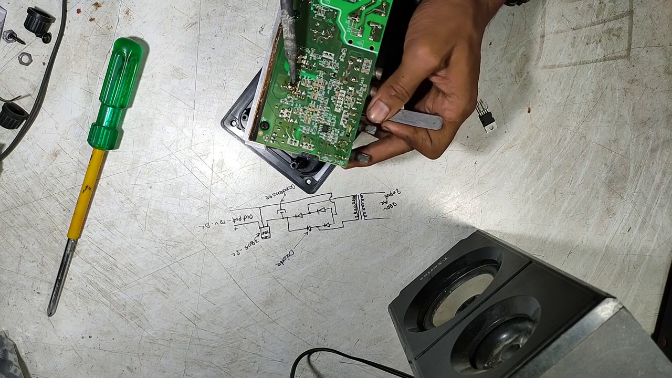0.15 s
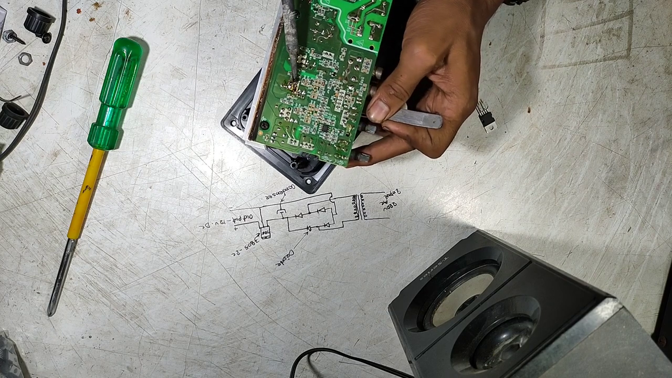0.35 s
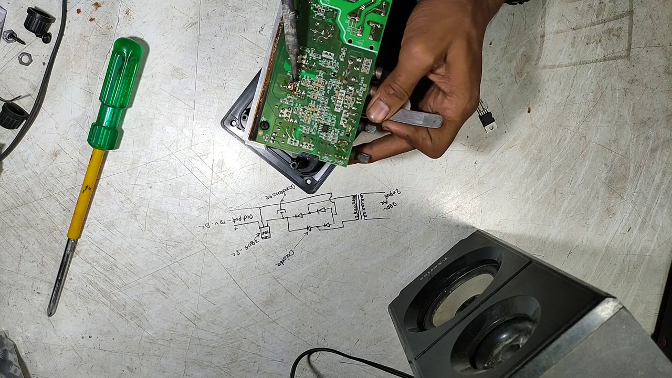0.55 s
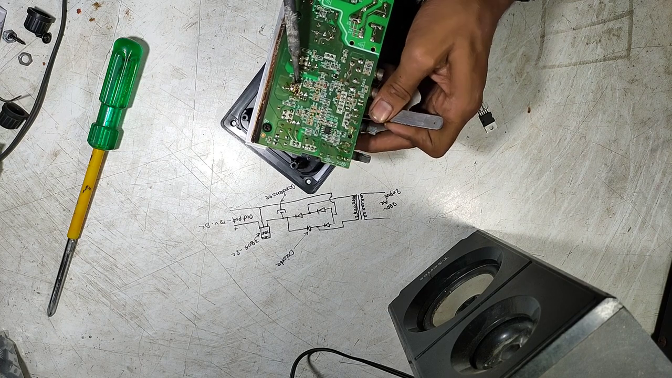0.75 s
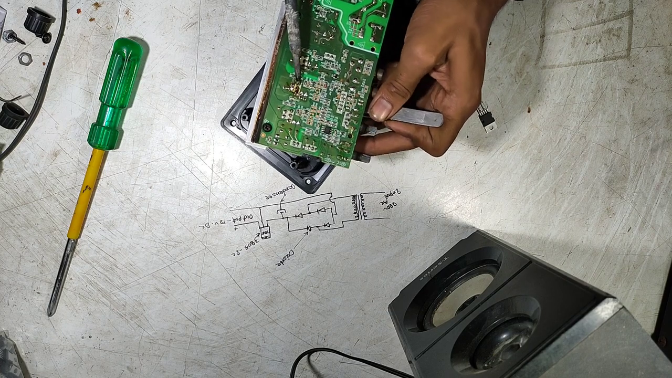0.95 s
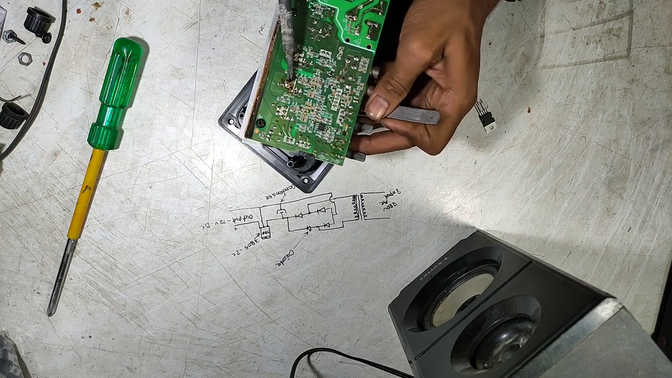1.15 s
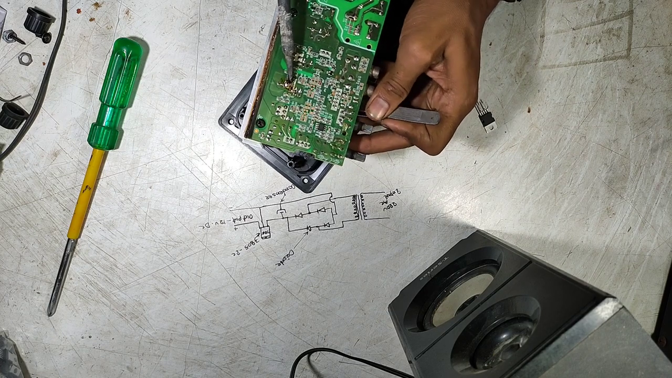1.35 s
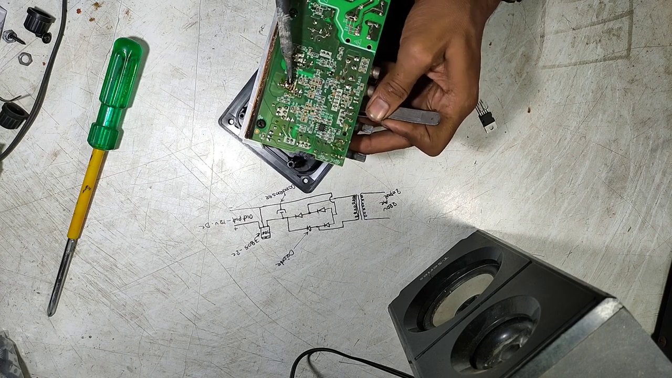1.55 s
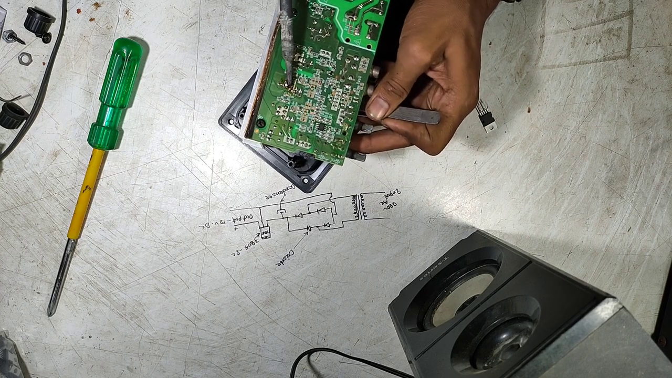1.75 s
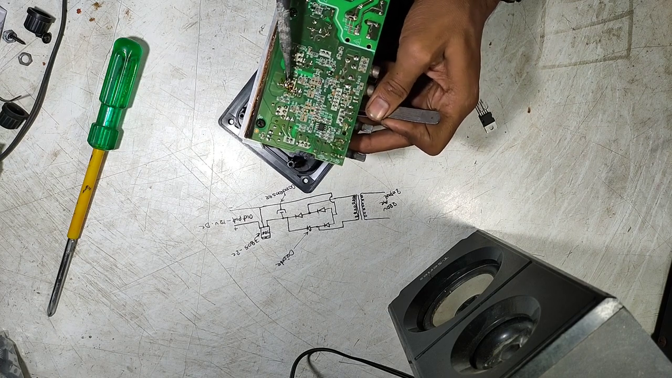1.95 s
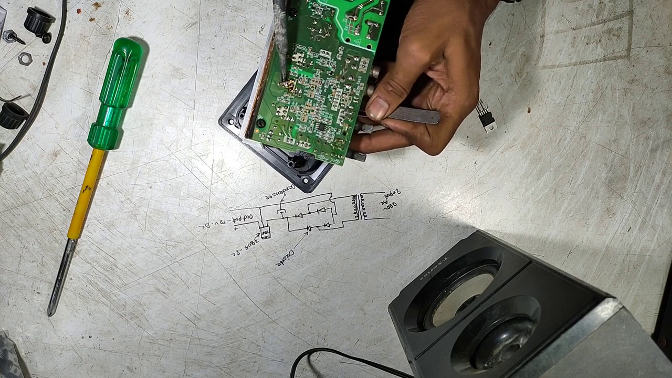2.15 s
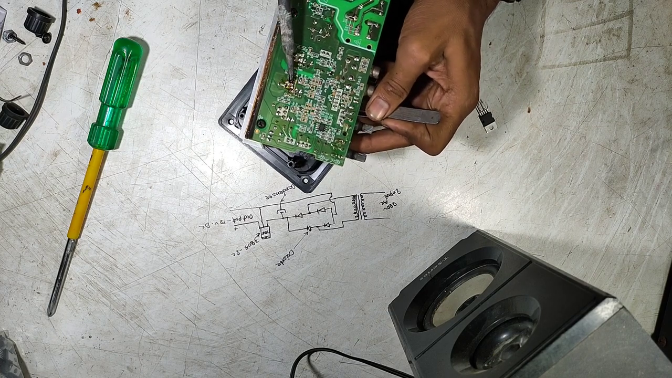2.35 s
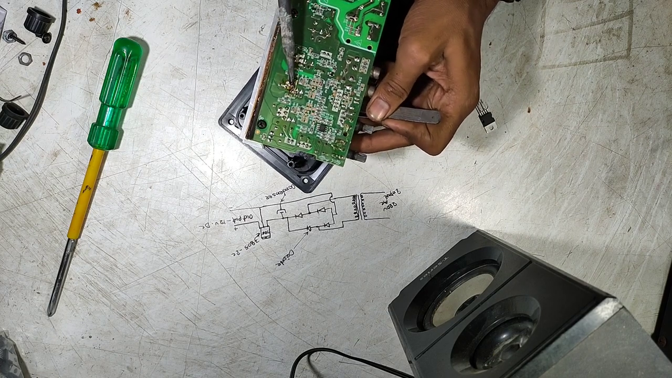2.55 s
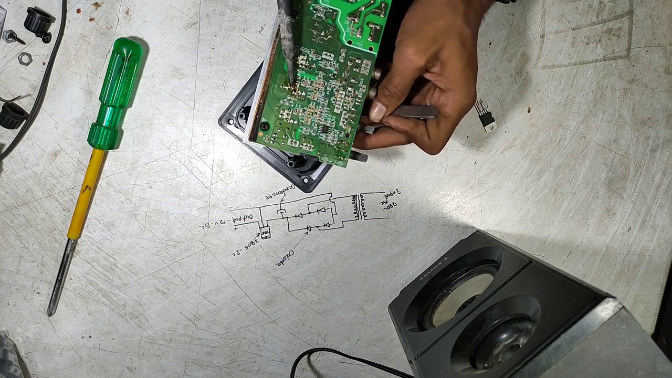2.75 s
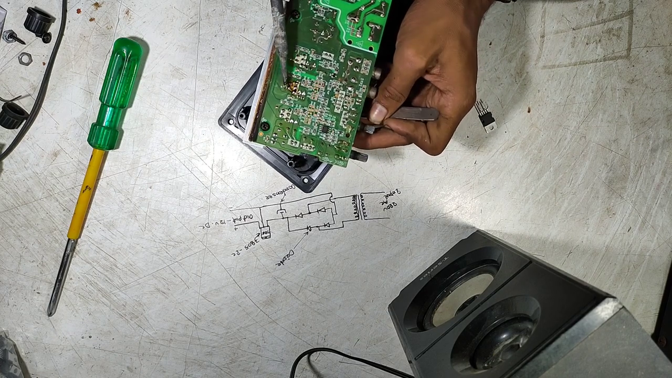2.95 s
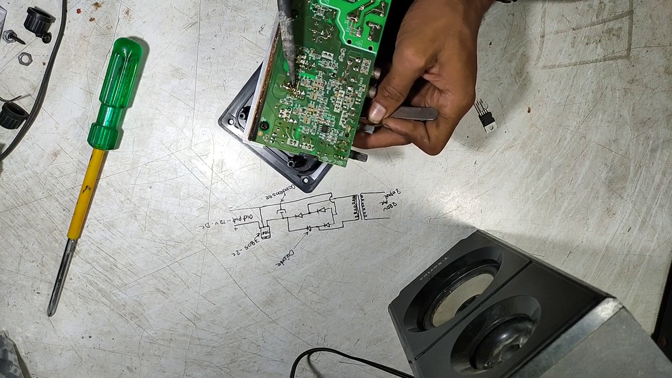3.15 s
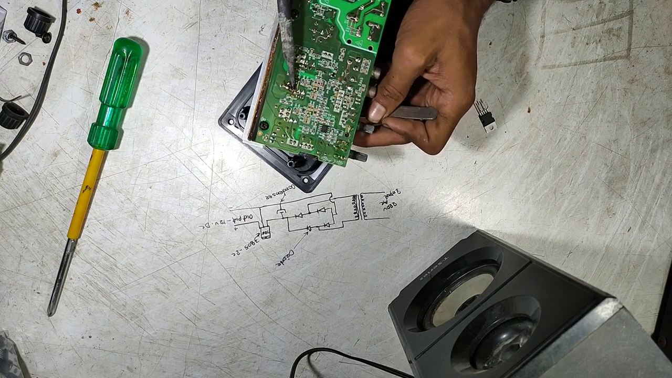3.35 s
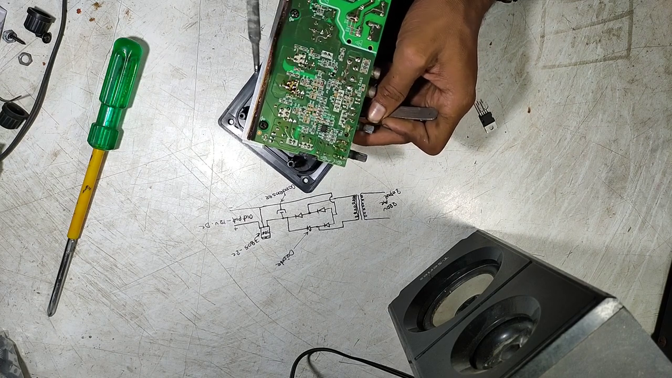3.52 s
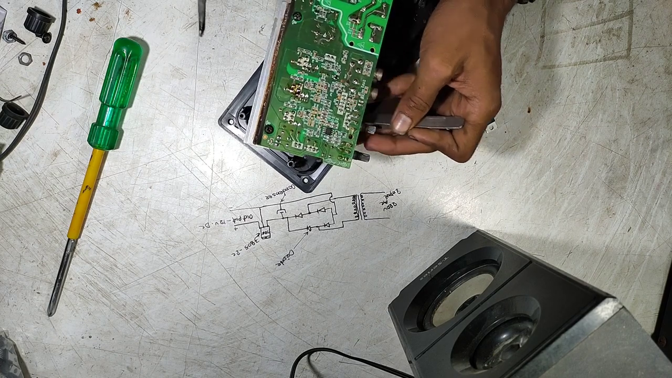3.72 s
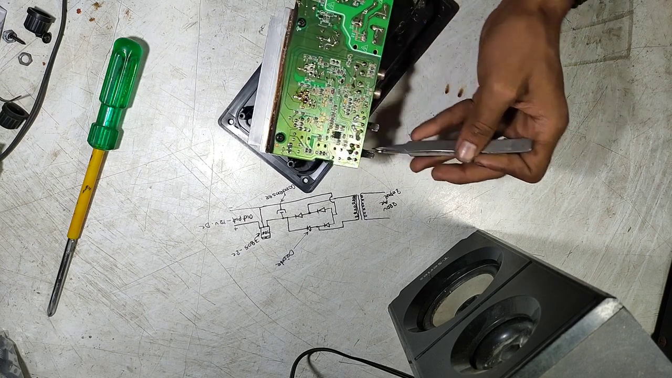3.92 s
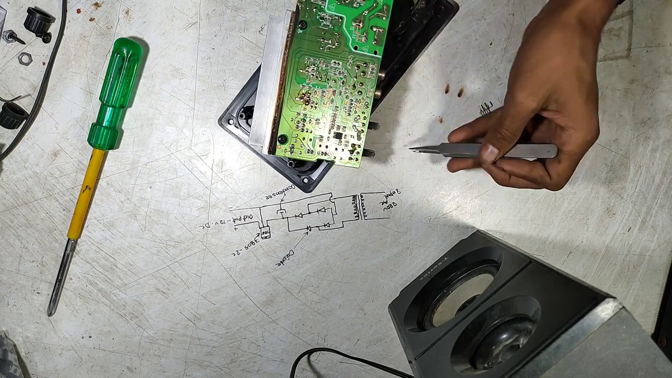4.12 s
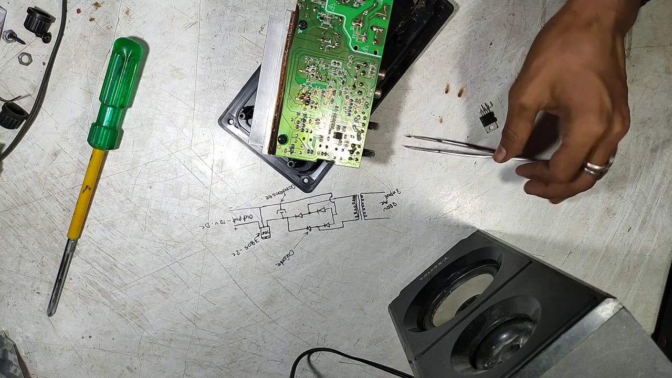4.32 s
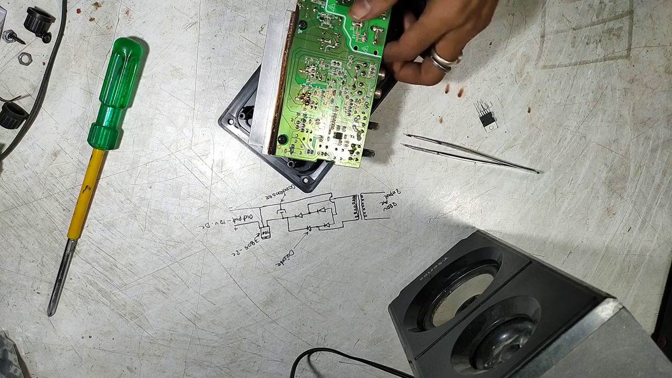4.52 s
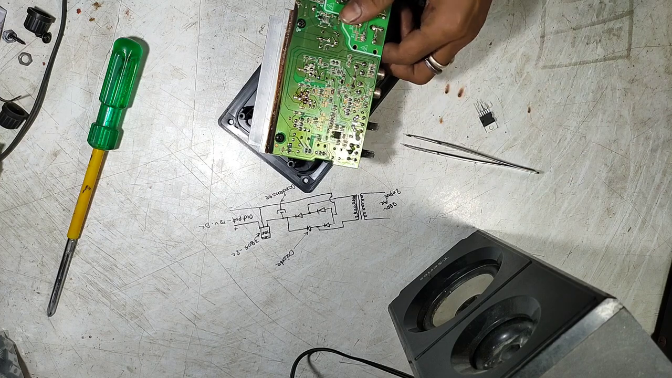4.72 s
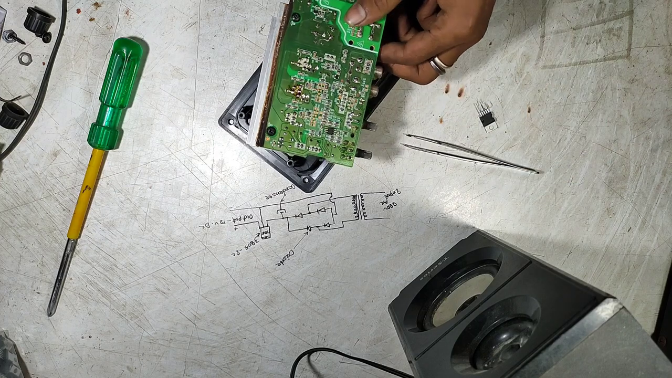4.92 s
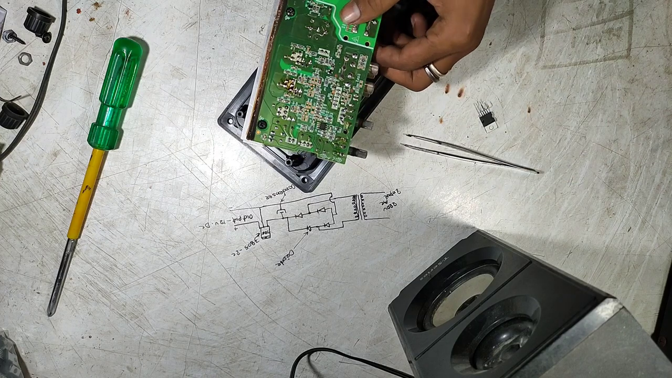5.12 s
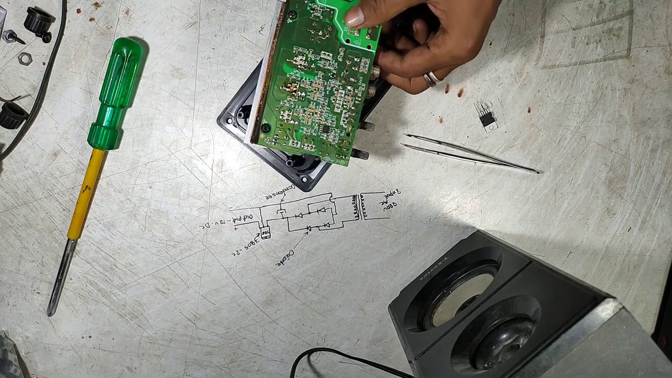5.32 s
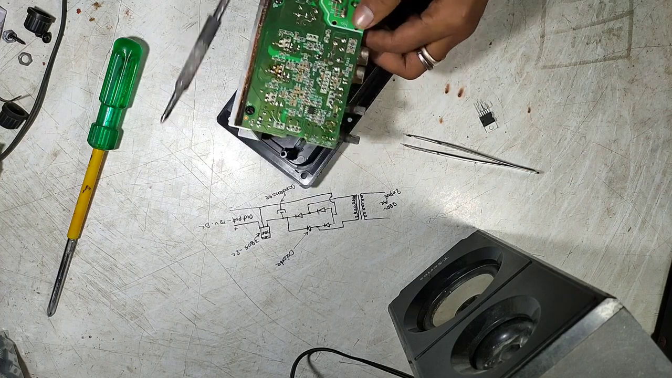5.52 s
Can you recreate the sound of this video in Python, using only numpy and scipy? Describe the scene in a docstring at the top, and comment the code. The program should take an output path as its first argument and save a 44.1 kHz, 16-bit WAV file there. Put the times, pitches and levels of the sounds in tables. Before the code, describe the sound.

Soldering work at a bench: faint flux sizzle, knocks and taps on a circuit board, then metal tweezers clattering down, over a low fan rumble.

```python
"""Soldering at a workbench, with a fan rumbling throughout as coloured noise and a small room echoing the work.
Early on the board is knocked and tapped, ringing bench, board and metal modes; flux crackles, sizzles as
filtered grains and squeaks as gliding tones. Mid-scene come harder knocks and low thumps, and the board
slides in grainy friction. Then steel tweezers bounce, rattle and skid on the bench, ringing their own modes.
Last come a few more knocks, taps and thumps, and the board is shifted by hand once more."""
import sys
import numpy as np
from scipy import signal
from scipy.fft import rfft, irfft, next_fast_len
from scipy.io import wavfile

SR = 44100
rng = np.random.default_rng(int(sys.argv[2]) if len(sys.argv) > 2 else 0)


def wav_record(signal):
    """Record a signal, one row per channel, as 16-bit PCM in the file named by sys.argv[1]."""
    frames = np.transpose(np.atleast_2d(signal))
    bounded = np.clip(frames, -1, 1)
    # unit amplitude maps onto the largest positive 16-bit level
    quanta = np.round(bounded * 32767).astype(np.int16)
    wavfile.write(sys.argv[1], SR, quanta)


N = 250488
HIT_SIZE = SR // 6  # samples in one blow
LEVEL_WINDOW = SR // 100  # samples over which a blow's level is defined


def from_db(db):
    """Decibels to gain."""
    return 10 ** (np.asarray(db) / 20)


def rms_one(x):
    """Scale to rms 1."""
    return x / np.sqrt(np.mean(x ** 2) + 1e-20)


def blow_at(x, db):
    """Give a blow the energy of 10 ms of sound at this level."""
    return from_db(db) * rms_one(x) * np.sqrt(LEVEL_WINDOW / len(x))


def add(out, start_s, x):
    """Mix x into out from start_s."""
    i = int(np.clip(round(start_s * SR), 0, N - 1))
    out[i:i + len(x)] += x[:N - i]


def cut(x, hz, kind, order=2):
    """Butterworth low- or high-pass."""
    sos = signal.butter(order, min(hz, .45 * SR), kind, fs=SR, output="sos")
    return signal.sosfilt(sos, x)


def colour(x, points):
    """Causal (minimum-phase) filter that follows a spectrum and falls away beyond its ends."""
    size = 2 * next_fast_len(len(x))
    hz, db = np.transpose(points)
    octave = np.log2(np.maximum(np.fft.rfftfreq(size, 1 / SR), 2))
    known = np.log2(hz)
    # 20 dB per octave outside the curve, for at most two octaves
    beyond = np.minimum(abs(octave - np.clip(octave, known[0], known[-1])), 2)
    cepstrum = irfft(np.log(from_db(np.interp(octave, known, db) - 20 * beyond)))
    # folding the cepstrum onto positive time makes the phase minimal
    cepstrum[1:size // 2] *= 2
    cepstrum[size // 2 + 1:] = 0
    response = np.exp(rfft(cepstrum))
    return irfft(rfft(x, size) * response)[:len(x)]


def drift(size, per_s):
    """Straight lines joining random normal points (mean 0, spread 1), per_s points a second."""
    steps = np.arange(size) * per_s / SR
    count = int(steps[-1]) + 2
    return np.interp(steps, np.arange(count), rng.standard_normal(count))


def grains(size, per_s, spread_db):
    """Random tiny clicks of uneven strength."""
    strength = from_db(spread_db * np.minimum(rng.exponential(1, size), 4))
    return strength * rng.standard_normal(size) * (rng.random(size) < per_s / SR)


def ring(force, modes, centre_hz, focus_db):
    """Modes driven by a force; the point of contact favours those near centre_hz, by focus_db an octave away."""
    out = 0
    for hz, db, t60 in modes:
        r = from_db(-60 / (t60 * SR))  # decay per sample
        w = 2 * np.pi * hz / SR
        focus = focus_db * np.log2(hz / centre_hz) ** 2
        weight = from_db(db - focus + 2 * rng.standard_normal())
        sign = np.sign(rng.random() - .25)  # about one mode in four is inverted
        mode = signal.lfilter([0, np.sin(w)], [1, -2 * r * np.cos(w), r * r], force + 1e-18)
        out = out + sign * weight * mode
    return out


# fan rumble and air rush spectra: (pitch_hz, relative density_db per Hz)
FAN_RUMBLE = [(8.8, -37.5), (15, 1.5), (32, -2.5), (59, -7), (76, -14.5), (102, -16.5), (130, -22),
              (193, -24), (249, -29.5), (322, -29), (389, -37), (607, -40.5), (900, -60.5), (1170, -82.5),
              (1980, -120)]
FAN_AIR = [(350, -13.5), (700, 3), (1200, -2.5), (1800, -2), (2600, -8.5), (3700, -7.5), (4450, -7.5),
           (4900, -17), (8000, -24), (12000, -25), (15500, -33.5)]
RUMBLE_DB, AIR_DB = -33, -60.5


def fan():
    """A low rumble under a soft rush of air: two layers of coloured noise."""
    rumble, air = rng.standard_normal((2, N))
    rumble = from_db(RUMBLE_DB) * rms_one(colour(rumble, FAN_RUMBLE))
    return rumble + from_db(AIR_DB) * rms_one(colour(air, FAN_AIR))


def contact(chatter_t60, chatter_per_s):
    """One sharp touch followed by micro-bounces; the longer they last, the more of the blow they carry."""
    t = np.arange(HIT_SIZE) / SR
    chatter_t60 = max(chatter_t60, .001)
    force = grains(HIT_SIZE, per_s=9000, spread_db=3) * from_db(-60 * t / chatter_t60)
    force *= np.sqrt(chatter_per_s * chatter_t60 / (np.sum(force ** 2) + 1e-20))
    force[0] += 1
    return force


# spectrum of a hard contact: (pitch_hz, relative density_db per Hz)
SNAP_COLOUR = [(3000, -25.5), (4800, 2.5), (6500, 3), (9500, 0.5), (12500, -6.5), (14500, -10.5),
               (15800, -24.5)]


def snap(force, t60):
    """The crowded, heavily damped top modes of a hard contact, as decaying noise."""
    t = np.arange(SR // 40) / SR
    crack = rng.standard_normal(len(t)) * from_db(-60 * t / t60)
    return colour(signal.fftconvolve(force, crack)[:len(force)], SNAP_COLOUR)


# resonances of bench top, board and small metal parts, before contact weighting:
# (pitch_hz, relative level_db, t60_s)
BENCH_MODES = [(64.9, 11, 0.1), (93, -4, 0.38), (120, -7.5, .08), (149.32, -3, 0.089), (181.9, -2.5, .1),
               (231.47, -3.5, .06), (283.4, -2, .065), (333.6, -7, 0.13), (380.3, -3.5, 0.098),
               (465, -4.5, 0.051), (570, -0.5, .025)]
BOARD_MODES = [(604, -3, 0.0314), (730, -6.5, 0.049), (854.8, -7.5, .024), (994, -5, 0.016),
               (1160.2, -3.5, 0.018), (1205, -9, 0.02), (1408, -2, 0.011), (1602, 4, 0.011),
               (1810, -4.5, .012)]
METAL_MODES = [(2188.8, -2.5, .018), (2492, -0.5, .014), (2749.5, -11, 0.012), (3020, -7.5, .016),
               (3419, -0.5, 0.0097), (3791, -0.5, 0.0073), (4010, -7, 0.013), (4314.4, -5.5, .014)]


def blow(thud_db, clack_db, tick_db, snap_db, thud_hz, clack_hz, chatter_t60):
    """One blow shakes the bench, the board and the small metal parts on it."""
    force = contact(chatter_t60, chatter_per_s=201.5)
    thud = cut(ring(force, BENCH_MODES, thud_hz, focus_db=5.5), 900, "low")
    clack = cut(ring(force, BOARD_MODES, clack_hz, focus_db=11), 2000, "low")
    tick = cut(ring(force, METAL_MODES, 3700, focus_db=2.5), 4228, "low", order=10)
    body = blow_at(thud, thud_db) + blow_at(clack, clack_db)
    return body + blow_at(tick, tick_db) + blow_at(snap(force, t60=0.0036), snap_db)


THUD_HZ, THUD_OCTAVES_PER_S = 210, 3  # the longer the contact chatters, the deeper the thud
CLACK_HZ, CLACK_OCTAVES_PER_DB = 1850, .021  # at a tick of 0 dB; softer contacts clack lower
SNAP_BELOW_TICK_DB = 14.5


def knock(thud_db, clack_db, tick_db, chatter_t60):
    """A firm contact with a sharp snap: the harder it is the brighter, the longer the deeper."""
    thud_hz = THUD_HZ * 2 ** (-THUD_OCTAVES_PER_S * chatter_t60)
    clack_hz = CLACK_HZ * 2 ** (CLACK_OCTAVES_PER_DB * tick_db)
    return blow(thud_db, clack_db, tick_db, tick_db - SNAP_BELOW_TICK_DB, thud_hz, clack_hz, chatter_t60)


# the board knocked by the iron or against its chassis, and one firm tap of a tool at 3.94 s: # (start_s, bench
# thud_db, board clack_db, metal tick_db, chatter_t60_s)
BOARD_KNOCKS = [(.0208, -35, -54, -57, .07), (.5788, -31, -47, -51, .026), (.6923, -32, -55, -49, .04),
                (.7242, -31, -49, -51, .11), (.7602, -34, -50, -51, .06), (.8791, -33, -46, -49, .1),
                (.996, -16, -22, -25, .046), (1.1134, -25, -36, -40, .12), (1.1414, -23, -32, -53, .045),
                (1.1956, -30, -43, -40, .008), (1.764, -28, -47, -45, .03), (1.8207, -21, -33, -54, .046),
                (1.8557, -44, -50, -53, .018), (2.1545, -42, -45, -49, .014), (2.1866, -27, -31, -42, .028),
                (2.4392, -18, -39, -31, .007), (2.471, -27, -47, -48, .058), (2.5141, -32, -47, -48, .004),
                (2.5998, -16, -33, -35, .057), (2.6498, -33, -50, -53, .018), (2.6847, -28, -40, -47, .027),
                (2.715, -16, -40, -23, .008), (2.7174, -28, -21, -16, .013), (2.7245, -15, -4, -11, .023),
                (2.7399, -19, -21, -27, .055), (2.7565, -18, -31, -37, .038), (2.941, -40, -45, -51, .027),
                (2.9637, -33, -40, -49, .035), (2.992, -33, -43, -53, .02), (3.9392, -23, -39, -35, .06),
                (4.7425, -48, -52, -46, .003), (4.8593, -12, -19, -17, .006), (4.8845, -15, -23, -37, .02),
                (4.8961, -22, -29, -43, .06), (4.978, -13, -17, -29, .002)]
# light taps of a tool as it is moved: (start_s, bench thud_db, board clack_db, metal tick_db)
TOOL_TAPS = [(.281, -50, -54, -65), (1.6119, -42, -49, -70), (2.8257, -34, -37, -55),
             (3.7882, -33, -18, -24), (3.8089, -32, -23, -33), (3.8381, -25, -34, -42),
             (3.8918, -31, -29, -35), (4.0474, -27, -28, -43), (4.1135, -20, -18, -39),
             (4.1219, -27, -35, -56), (4.1649, -35, -43, -58), (4.1975, -28, -30, -58),
             (4.633, -21, -24, -32), (4.661, -33, -32, -39), (4.7969, -35, -44, -56),
             (5.4176, -29, -21, -41), (5.6757, -32, -29, -42)]
TAP_THUD_HZ, TAP_CLACK_HZ = 245, 1190
TAP_SNAP_BELOW_TICK_DB, TAP_CHATTER_T60_S = 25, .006


def board_knocks():
    """Firm knocks and the duller taps of a tool, each a struck set of modes."""
    out = np.zeros(N)
    for start_s, thud_db, clack_db, tick_db, chatter_t60 in BOARD_KNOCKS:
        add(out, start_s, knock(thud_db, clack_db, tick_db, chatter_t60))
    for start_s, thud_db, clack_db, tick_db in TOOL_TAPS:
        snap_db = tick_db - TAP_SNAP_BELOW_TICK_DB
        tap = blow(thud_db, clack_db, tick_db, snap_db, TAP_THUD_HZ, TAP_CLACK_HZ, TAP_CHATTER_T60_S)
        add(out, start_s, tap)
    return out


def reflections(x, t60, db, top_hz):
    """A diffuse, dulled tail of echoes; the longer it lasts, the more slowly it builds."""
    t = np.arange(SR // 2) / SR
    build = np.minimum(30 * t / t60, 1)
    tail = rng.standard_normal(len(t)) * from_db(-60 * t / t60) * build
    tail = cut(tail / np.sqrt(np.sum(tail ** 2)), top_hz, "low", order=1)
    return from_db(db) * signal.fftconvolve(x, tail)[:N]


# bubble spectra of boiling flux, low and high: (pitch_hz, relative density_db per Hz)
SPUTTER_COLOUR = [(500, -12), (1300, -5), (1950, 11), (2800, -9.5), (4100, 4.5), (4600, -13.5), (5300, -23)]
HISS_COLOUR = [(3500, -22.5), (5000, -13.5), (7000, -0.5), (8500, -2.5), (10500, -2.5), (12500, -10.5),
               (14500, -13), (15800, -21)]


def simmer():
    """Under and between puffs the hot joint keeps up a faint crackle of sparse grains."""
    heat = np.interp(np.arange(N) / SR, [.4, .8, 1.3, 1.7, 3.0, 3.6], [0, 1, 1, .3, .4, 0])
    pops = grains(N, per_s=400, spread_db=3.5)
    sputter = from_db(-70) * rms_one(colour(pops, SPUTTER_COLOUR))
    hiss = from_db(-73) * rms_one(colour(pops, HISS_COLOUR))
    return heat * (sputter + hiss)


def squeak(length, from_hz, to_hz):
    """A rough, gliding whistle of vapour through a closing gap; rms 1."""
    size = int(length * SR)
    hz = np.geomspace(from_hz, to_hz, size) * (1 + .045 * drift(size, per_s=2030))
    swell = signal.windows.tukey(size, .7) * from_db(3 * drift(size, per_s=599))
    return rms_one(swell * np.sin(2 * np.pi * np.cumsum(hz) / SR))


def whistles(length, low_hz, high_hz, count):
    """Tiny whistles of bursting bubbles, scattered in time and pitch over a puff."""
    out = np.zeros(int(length * SR))
    for when, pitch, glide in rng.random((count, 3)):
        hz = low_hz + (high_hz - low_hz) * pitch
        chirp = squeak(.007, hz, hz * (.88 + .24 * glide))[:len(out)]
        i = int(when * (len(out) - len(chirp)))
        out[i:i + len(chirp)] += chirp
    return out


# puffs of flux boiling off: (start_s, length_s, sputter_db, hiss_db)
FLUX_PUFFS = [(.454, .027, -51, -48), (.483, .034, -41, -42), (.578, .017, -45, -55), (.815, .04, -56, -75),
              (.846, .09, -50, -61), (.917, .095, -52, -56), (1.04, .027, -39, -50), (1.103, .06, -49, -61),
              (1.18, .06, -61, -63), (1.321, .05, -51, -63), (1.456, .024, -50, -63),
              (1.784, .036, -51, -65), (1.917, .038, -31.5, -42), (1.963, .06, -59, -71),
              (2.198, .028, -54, -65), (2.8, .033, -51, -66), (3.382, .032, -53, -69),
              (3.442, .04, -57, -75), (3.526, .021, -52, -70)]
# vapour squeaking out of the joint: (start_s, length_s, start pitch_hz, end pitch_hz, level_db)
VAPOUR_SQUEAKS = [(.463, .01, 11200, 10180, -47), (.481, .023, 8790, 7785, -38),
                  (.504, .013, 3595, 1481, -44), (1.12, .016, 7540, 8000, -49),
                  (1.18, .046, 8600, 9900, -51), (1.264, .012, 9105, 8240, -60),
                  (1.315, .016, 10100, 8380, -47), (1.942, .013, 1993, 4450, -47),
                  (1.956, .013, 8651, 10340, -41), (3.032, .026, 11600, 11400, -55)]
BURST_DB, WHISTLE_DB = -2, -5  # levels of the bursts and whistles relative to the puff


def flux():
    """Puffs of boiling flux: dense bursting bubbles, mixed with tiny whistles and a few longer squeaks."""
    out = np.zeros(N)
    for start_s, length, sputter_db, hiss_db in FLUX_PUFFS:
        size, count = int(length * SR), int(length * 170)
        puff = signal.windows.tukey(size, .35) * from_db(3.5 * drift(size, per_s=200))
        bursts = puff * grains(size, per_s=11000, spread_db=-0.5)
        layers = [(sputter_db, SPUTTER_COLOUR, 1700, 4300), (hiss_db, HISS_COLOUR, 5500, 12500)]
        for db, spectrum, low_hz, high_hz in layers:
            add(out, start_s, from_db(db + BURST_DB) * rms_one(colour(bursts, spectrum)))
            add(out, start_s, from_db(db + WHISTLE_DB) * whistles(length, low_hz, high_hz, count))
    for start_s, length, from_hz, to_hz, db in VAPOUR_SQUEAKS:
        add(out, start_s, from_db(db) * squeak(length, from_hz, to_hz))
    return out


# the heaviest blows rock the whole bench top: (start_s, pitch_hz, level_db, t60_s)
BENCH_THUMPS = [(2.723, 80.88, -11.5, 0.304), (3.937, 88.6, -26.5, 0.103), (4.858, 95.8, -15, 0.42),
                (4.98, 97.3, -15, 0.227)]


def thumps():
    """The bench top sways: one low, decaying sine per thump."""
    out = np.zeros(N)
    t = np.arange(SR // 3) / SR
    for start_s, hz, db, t60 in BENCH_THUMPS:
        sway = np.sin(2 * np.pi * hz * t) * from_db(-60 * t / t60)
        add(out, start_s, blow_at(sway, db))
    return out


# strokes of the board rubbing on its chassis as the hand moves it, each a level curve:
# (time_s, level_db relative to SLIDE_DB)
BOARD_SLIDES = [
    [(2.8, -54.5), (2.826, -61.5), (2.95, -65.5), (3.2, -64)],
    [(3.68, -60), (3.752, -45), (3.892, -39), (3.964, -50.5), (4.13, -54.5), (4.23, -54.5), (4.33, -41)],
    [(5.44, -67), (5.478, -52), (5.604, -49), (5.68, -42)],
]
# spectrum of the rubbing: (pitch_hz, relative density_db per Hz)
RUB_COLOUR = [(150, -4), (350, 2.5), (650, -10.5), (1000, 3), (1350, 3.5), (2000, -7.5), (3000, -8),
              (4350, -10.5), (4900, -25.5), (10000, -30.5), (15000, -38)]
SLIDE_DB = 1.5  # overall level of the rubbing, added to each curve
CATCH_DB = -15.5  # catches relative to the slips


def sliding():
    """Friction: dense uneven slips under each stroke, and now and then a rough spot that catches."""
    out = np.zeros(N)
    for stroke in BOARD_SLIDES:
        s, db = np.transpose(stroke)
        t = np.arange(s[0], s[-1], 1 / SR)
        grip = from_db(3 * drift(len(t), per_s=110))
        catches = rms_one(grains(len(t), per_s=91, spread_db=-1.5))
        slips = rms_one(grip * grains(len(t), per_s=6300, spread_db=1.0))
        rub = rms_one(colour(slips + from_db(CATCH_DB) * catches, RUB_COLOUR))
        fade = signal.windows.tukey(len(t), .12)
        add(out, s[0], fade * from_db(np.interp(t, s, db) + SLIDE_DB) * rub)
    return out


# with only their tips down the tweezers rattle in a quick run whose low ring grows louder
RATTLE_START_S, RATTLE_GAP_S, RATTLE_CHATTER_T60_S = 4.389, .0097, .025
RATTLE_LOW_DB, RATTLE_GROWTH_DB = -28.5, 1.4  # low ring of the first touch, gain per touch
RATTLE_HIGH_DB, RATTLE_SNAP_DB = -42, -50


def rattle(count):
    """A nearly even run of touches, each with a louder low ring; rows as for the bounces."""
    touches = []
    for k, slip in enumerate(rng.normal(0, .12, count)):
        start_s = RATTLE_START_S + RATTLE_GAP_S * (k + slip)
        low_db = RATTLE_LOW_DB + RATTLE_GROWTH_DB * k
        touches.append((start_s, low_db, RATTLE_HIGH_DB, RATTLE_SNAP_DB, RATTLE_CHATTER_T60_S))
    return touches


# tweezers landing and bouncing:
# (start_s, low ring level_db, high ring level_db, contact snap_db, chatter_t60_s)
TWEEZER_BOUNCES = [(4.2825, -26, -32, -51, .059), (4.357, -32, -38, -48, .04),
                   (4.3634, -21, -30, -43, .034), (4.4622, -17, -27, -47, .023),
                   (4.475, -21, -23, -36, .032), (4.488, -22, -24, -48, .035),
                   (4.5047, -14, -15, -36, .027), (4.5239, -27, -23, -34, .07), (4.539, -15, -16, -42, .01),
                   (4.548, -20, -30, -48, .011), (4.5567, -19, -24, -47, .008)]
# low and high resonances of the steel, before contact weighting: (pitch_hz, relative level_db, t60_s)
STEEL_LOW = [(476, -5, .03), (576.6, 3, 0.0328), (677.5, -1.5, 0.043), (785, -9.5, .02), (864, 0, 0.0224),
             (1005.7, 0.5, 0.026), (1164, 0, 0.0231), (1256, -3.5, 0.028), (1440, -2.5, 0.02),
             (1650, 4, 0.014), (1742.5, -4.5, 0.044), (1892, -3.5, 0.014)]
STEEL_HIGH = [(2152, 5, 0.017), (2344, 6, 0.0074), (2453, 7, 0.0154), (2647, -2, 0.013),
              (2889, 5.5, 0.0255), (3087, 6.5, 0.0249), (3474, 1.5, 0.026), (3729, 0.5, 0.0212),
              (4123, 5, 0.023), (4091, -14.5, 0.018), (4420, -18, 0.0187)]
TWEEZER_THUD_DB, TWEEZER_THUD_HZ, TWEEZER_LOW_HZ = -30, 360, 1150


def tweezers():
    """The steel legs bounce on the bench top and ring briefly, damped by lying on it."""
    out = np.zeros(N)
    for start_s, low_db, high_db, snap_db, chatter_t60 in TWEEZER_BOUNCES + rattle(count=6):
        force = contact(chatter_t60, chatter_per_s=45.6)
        thud = ring(force, BENCH_MODES, TWEEZER_THUD_HZ, focus_db=11)
        low = ring(force, STEEL_LOW, TWEEZER_LOW_HZ, focus_db=2)
        high = ring(force, STEEL_HIGH, 3900, focus_db=7.5)
        add(out, start_s, blow_at(thud, TWEEZER_THUD_DB) + blow_at(low, low_db) + blow_at(high, high_db))
        add(out, start_s, blow_at(snap(force, t60=0.027), snap_db))
    return out


# the scrape swells as the tweezers tip over, and stops when they lie flat
SKID_START_S, SKID_END_S, SKID_RELEASE_S = 4.355, 4.571, .01
SKID_END_DB, SKID_SWELL_DB_PER_S = -23.5, 95  # level of the low ring before the release


def skid():
    """Between bounces the steel scrapes along the bench; grainy slips keep its modes sounding."""
    left = np.arange(SKID_END_S - SKID_START_S, 0, -1 / SR)  # seconds until they lie flat
    swell = from_db(SKID_END_DB - SKID_SWELL_DB_PER_S * left) * np.minimum(left / SKID_RELEASE_S, 1)
    slips = grains(len(left), per_s=5500, spread_db=1)
    low = rms_one(ring(slips, STEEL_LOW, 950, focus_db=0))
    # negative focus favours the modes far from the centre
    high = from_db(-9.5) * rms_one(ring(slips, STEEL_HIGH, 3400, focus_db=-2.0))
    hiss = from_db(-23.5) * rms_one(colour(slips, SNAP_COLOUR))
    out = np.zeros(N)
    add(out, SKID_START_S, swell * (low + high + hiss))
    return out


def scene():
    """The work on the bench, echoes from the things around it and from the walls, and the fan."""
    work = board_knocks() + thumps() + tweezers() + skid() + flux() + simmer() + sliding()
    near = reflections(work, t60=0.058, db=-11, top_hz=9000)
    walls = reflections(work, t60=0.36, db=-21, top_hz=700)
    return (work + near + walls + fan())[None]


CUTOFF_HZ = 15300


def record(dry):
    """The hardest blows overload the microphone, rounding their peaks; a steep low-pass cuts the top."""
    clipped = dry / (1 + dry ** 6) ** (1 / 6)
    return signal.sosfilt(signal.ellip(10, .1, 70, CUTOFF_HZ, fs=SR, output="sos"), clipped)


dry = scene()
out = record(dry)
wav_record(out)
```